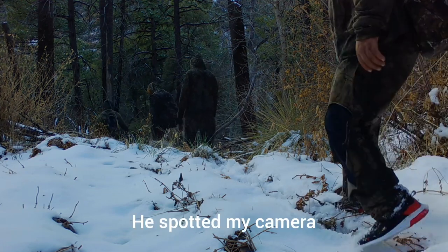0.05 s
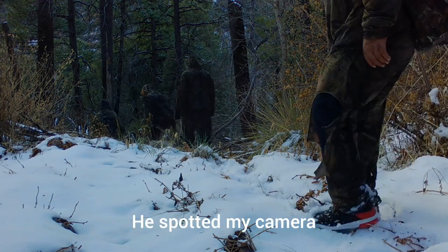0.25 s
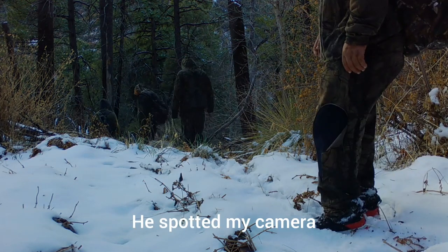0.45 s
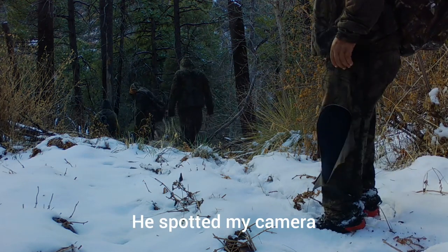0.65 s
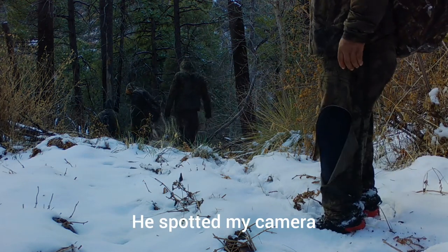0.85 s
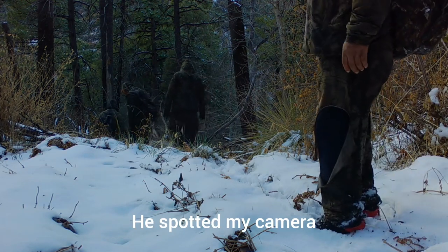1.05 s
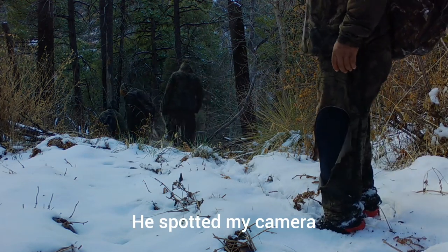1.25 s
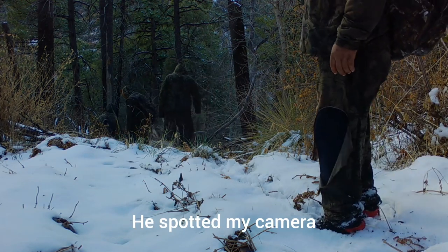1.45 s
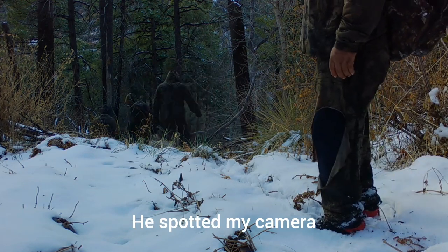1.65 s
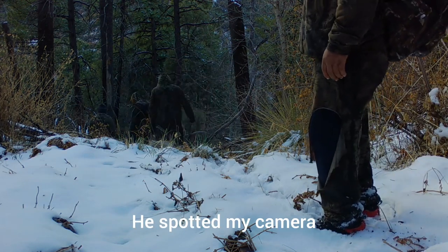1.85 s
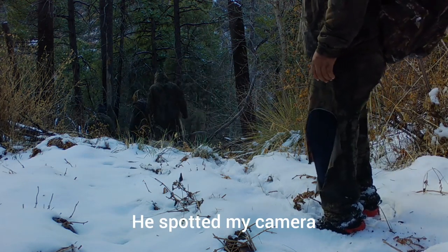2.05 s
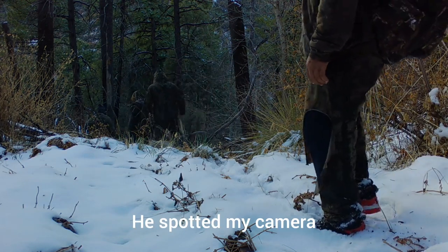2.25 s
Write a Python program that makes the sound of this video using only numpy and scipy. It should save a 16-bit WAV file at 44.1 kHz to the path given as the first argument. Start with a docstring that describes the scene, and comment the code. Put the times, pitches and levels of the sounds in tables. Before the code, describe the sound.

A sharp twig snap underfoot, then soft snowy footsteps and swishing dry stalks.

```python
"""A twig snaps sharply as a nearby walker sets a boot in snow among dry brush, shifts weight and moves on.
The fracture excites the twig's damped modes. Snow crunches as its crystals break and gives way in dull
knocks; stiff trouser cloth and dry stalks swish by stick-slip friction. The impacts echo faintly,
and light wind bumps the microphone over the hiss of the forest."""
import sys
import numpy as np
from scipy import signal
from scipy.fft import rfft, irfft
from scipy.io import wavfile

SR = 44100
rng = np.random.default_rng(int(sys.argv[2]) if len(sys.argv) > 2 else 0)


def dump(signal):
    """Clip the signal to [-1, 1] and save it as 16-bit WAV at the path in sys.argv[1]."""
    limited = np.clip(np.atleast_2d(signal).T, -1, 1)
    pcm = np.round(limited * 32767).astype(np.int16)
    wavfile.write(sys.argv[1], SR, pcm)


N = 101429

# Spectra of the noise sources: frequency_hz, relative_db
FOREST_SPECTRUM = [(20, 6), (100, 12), (180, 7.5), (300, 2), (500, 2.5), (1000, -6.5), (2500, -12.5),
                   (4000, -3.5), (5200, 0.5), (6100, 4), (7500, -4.5), (10000, -8), (15800, -21.5)]
WIND_SPECTRUM = [(10, -11.5), (22, 0), (36, 1), (52, 0), (75, -11), (120, -18.5), (180, -25), (250, -32.5),
                 (600, -34.5), (2000, -76)]
SLOW_SWISH_SPECTRUM = [(1000, -27.5), (2000, -16), (2700, -12.5), (3600, -9), (4600, -6.5), (5400, -1),
                       (6150, -1), (7300, -5), (9000, -11), (12000, -20), (15800, -27.5)]
FAST_SWISH_SPECTRUM = [(1000, -33), (2400, -24), (3200, -13.5), (4500, -11), (5400, -5.5), (6150, 0),
                       (7300, -4.5), (8500, -8), (10000, -9.5), (12500, -17), (15800, -26)]
CRACKLE_SPECTRUM = [(1500, -26.5), (3000, -4.5), (4500, -7.5), (6200, 3), (8000, -2), (10500, -6.5),
                    (12500, -13.5), (15800, -17.5)]
SCUFF_SPECTRUM = [(150, -9), (500, 0), (1200, -5), (1900, 2.5), (2600, -3.5), (4000, 2), (5800, 4),
                  (7500, -10), (11000, -14.5), (15800, -30.5)]
SNOW_SPECTRUM = [(80, -4.5), (160, -3), (280, -2.5), (500, 0), (1200, 0), (2000, -1.5), (2700, -6.5),
                 (4000, -7.5), (8000, -35)]

# Envelopes of the wind, the rubbing cloth and stalks, and the crunching snow: time_s, level_db
WIND_LEVEL = [(0.0, -51), (0.03, -47), (0.13, -63), (0.17, -47.5), (0.34, -56), (0.37, -44.5),
              (0.63, -66.5), (0.78, -43), (0.84, -54), (0.9, -40.5), (0.97, -60), (1.29, -49.5),
              (1.43, -63.5), (1.8, -59), (1.82, -46), (2.0, -62.5), (2.1, -53.5), (2.3, -58.5)]
SWISH_LEVEL = [(0, -54.5), (.1, -64), (.125, -46.5), (.175, -43), (.2, -40.5), (.23, -41.5), (.26, -46.5),
               (.31, -44), (.345, -51), (.4, -53), (.425, -47.5), (.45, -57), (.51, -52), (.55, -60.5),
               (.59, -50.5), (.68, -55), (.72, -53.5), (.76, -46), (.84, -46.5), (.91, -50.5), (.97, -54.5),
               (1.05, -52.5), (1.1, -58.5), (1.135, -51), (1.175, -60), (1.207, -43), (1.28, -40),
               (1.33, -41.5), (1.38, -34.5), (1.435, -30.5), (1.48, -32), (1.512, -31.5), (1.525, -27.5),
               (1.55, -33.5), (1.63, -32.5), (1.72, -37), (1.83, -42.5), (1.86, -49), (1.89, -52),
               (1.955, -49.5), (1.98, -56.5), (2.02, -53), (2.05, -45.5), (2.11, -48.5), (2.17, -52),
               (2.22, -59), (2.3, -63.5)]
CRUNCH_LEVEL = [(0, -61), (0.1, -68.5), (0.13, -54.5), (0.18, -53), (0.24, -52.5), (0.32, -56), (0.36, -59),
                (0.43, -60.5), (0.46, -64.5), (0.51, -59), (0.55, -65.5), (0.59, -58.5), (0.65, -59.5),
                (0.71, -62), (0.76, -59.5), (0.81, -56), (0.87, -66.5), (0.93, -58.5), (0.96, -64),
                (1.02, -57), (1.13, -57), (1.16, -68), (1.19, -61), (1.215, -51), (1.29, -55.5),
                (1.35, -64.5), (1.42, -54.5), (1.51, -54.5), (1.54, -48), (1.67, -51.5), (1.74, -54),
                (1.82, -59.5), (1.9, -59), (1.94, -64.5), (2.02, -59), (2.05, -51.5), (2.1, -53),
                (2.15, -56.5), (2.21, -67.5), (2.3, -68.5)]

# Dry brush and loose snow crackling against the boot: start_s, length_s, level_db
BRUSH_CRACKLES = [(.04, 0.010653, -50.5), (.494, 0.01949, -50.5), (1.04, 0.00958, -57.5),
                  (1.859, 0.12782, -50), (2.042, 0.09364, -51.5)]
# The sole scuffing the crust: start_s, length_s, level_db
SOLE_SCUFFS = [(.298, 0.03776, -51.5), (.575, 0.01834, -53), (.735, 0.05966, -51.5), (.921, 0.009193, -48),
               (1.126, 0.01463, -47.5), (1.205, 0.03338, -47)]
# Snow giving way under the boot: start_s, peak_db, pitch_hz, t60_s
SNOW_KNOCKS = [(.0428, -35, 809.9, 0.01449), (.1842, -42, 592.7, 0.003235), (.1872, -33.5, 581.3, 0.008315),
               (.2622, -38.5, 1383, 0.00387), (.411, -44.5, 600, .01), (.435, -43.5, 483, 0.01024),
               (.514, -43, 789.9, 0.00954), (.586, -45, 415.1, 0.0142), (.7285, -35.5, 890.2, 0.00582),
               (.7297, -29, 614.4, 0.012254), (.925, -40.5, 1082, 0.01374), (1.116, -41, 1033, 0.00749),
               (1.212, -37.5, 1886, 0.00951), (1.6742, -39, 1100, 0.00715), (1.6887, -26.5, 1258, 0.00523),
               (1.6898, -33, 742.9, 0.01031), (1.7875, -42, 855.3, 0.00865), (1.843, -38.5, 400.6, 0.02359),
               (2.0965, -35.5, 850, .008)]
# The boot's weight meeting the ground: start_s, peak_db, pitch_hz, t60_s
BOOT_THUDS = [(.039, -40.5, 162.7, 0.04026), (.58, -46.5, 116.6, 0.0867), (.731, -41.5, 190.1, 0.0584),
              (1.425, -47.5, 160.1, 0.0499), (1.59, -43.5, 110.3, 0.0746), (2.03, -48, 128, 0.0997),
              (2.096, -43.5, 273.5, 0.02535), (2.103, -42, 103.4, 0.1003)]
# Dry stalks cracking and ice flakes falling: start_s, peak_db, pitch_hz
BRITTLE_TICKS = [(.0062, -30, 6284), (0.0249, -36.5, 5922), (0.0455, -33, 5663), (0.0505, -32, 5969),
                 (0.0796, -36, 6204), (0.1752, -26.5, 6201), (0.1784, -26.5, 6499), (0.2631, -33, 5880),
                 (0.5002, -37.5, 6384), (1.409, -24.5, 6210), (1.439, -27, 6215), (1.5238, -19.5, 6612),
                 (1.5336, -21.5, 6340), (1.877, -35.5, 6994), (1.8986, -33, 6397), (1.924, -39, 7190),
                 (1.9388, -39, 6470), (1.9528, -35.5, 6147), (1.9555, -29.5, 7471), (1.959, -31, 6506),
                 (1.9925, -33, 6280), (1.995, -31, 3149), (2.007, -41.5, 7400)]
# Vibration modes of the twig: frequency_hz, relative_db, t60_s
TWIG_MODES = [(1702.4, -18, 0.0015425), (2488.1, -27.5, 0.014466), (3349.2, -21.5, 0.008195),
              (4367.5, -14, 0.005298), (4876.7, -13.5, 0.013117), (5094.6, -16, 0.02181),
              (6279.6, 1.5, 0.006102), (7233.7, -0.5, 0.003245), (8331.6, -6, 0.002753),
              (12137, -11.5, 0.002078)]
# Treble roll-off of the snap: frequency_hz, gain_db
SNAP_ROLLOFF = [(1000, 0), (12500, 0.5), (13800, -0.5), (15500, -14)]

LN_1000 = np.log(1000)  # a 60 dB decay in nepers


def amp(db):
    """Decibels to an amplitude ratio."""
    return 10 ** (np.asarray(db) / 20)


def unit(x):
    """Normalisation to an rms of 1."""
    return x / np.sqrt(np.mean(x ** 2) + 1e-20)


def envelope(points):
    """Amplitude from linear interpolation of time_s, level_db rows."""
    return amp(np.interp(np.arange(N) / SR, *np.transpose(points)))


def add(mix, start_s, sound):
    """Superposition of a delayed sound on the mix."""
    part = mix[max(round(start_s * SR), 0):][:len(sound)]
    part += sound[:len(part)]


def colour(x, spectrum, size=4096):
    """Minimum-phase filtering: the phase follows from the Hilbert transform of the log gain."""
    points_hz, points_db = np.transpose(spectrum)
    hz = abs(np.fft.fftfreq(size, 1 / SR))
    log_gain = np.log(amp(np.interp(np.log(hz + 1), np.log(points_hz), points_db)))
    response = np.exp(np.conj(signal.hilbert(log_gain)))
    taps = np.fft.ifft(response).real
    return signal.fftconvolve(x, taps[:size // 2])[:len(x)]


def grains(per_s, spread_db):
    """Shot noise: independent tiny impulses, a few larger than the rest."""
    sizes = amp(spread_db * np.minimum(rng.exponential(1, N), 4))
    return sizes * rng.choice([-1, 1], N) * (rng.random(N) < per_s / SR)


def flutter(depth_db, rate_hz):
    """Random amplitude modulation: the uneven gain of sticking and slipping."""
    lowpass = np.exp(-(np.fft.rfftfreq(N, 1 / SR) / rate_hz) ** 2)
    wander = irfft(rfft(rng.standard_normal(N)) * lowpass, N)
    return amp(depth_db * unit(wander))


def air(forest_db=-56.5):
    """Pressure fluctuations of wind rumble on the microphone over steady forest hiss."""
    rumble = unit(colour(rng.standard_normal(N), WIND_SPECTRUM, size=16384))
    hiss = unit(colour(rng.standard_normal(N), FOREST_SPECTRUM))
    return envelope(WIND_LEVEL) * rumble + amp(forest_db) * hiss


def echoes(x, level_db, t60_s):
    """Scattering from ground, legs and trunks returns sparse, exponentially decaying reflections."""
    t = np.arange(SR // 2) / SR
    reflections = rng.standard_normal(len(t)) * (rng.random(len(t)) < .1) * (t > .003)
    taps = reflections * np.exp(-LN_1000 * t / t60_s)
    return amp(level_db) * signal.fftconvolve(x, taps / np.linalg.norm(taps))[:N]


def swish(slow_db=-45.5, fast_db=-31.5):
    """Stick-slip friction of countless fibres; faster rubbing is louder and brighter."""
    level = envelope(SWISH_LEVEL)
    fast_share = np.clip((20 * np.log10(level) - slow_db) / (fast_db - slow_db), 0, 1)
    slips = grains(per_s=14000, spread_db=2.5) * flutter(depth_db=1.2953, rate_hz=78.8)
    slow = unit(colour(slips, SLOW_SWISH_SPECTRUM))
    fast = unit(colour(slips, FAST_SWISH_SPECTRUM))
    return level * ((1 - fast_share) * slow + fast_share * fast)


def flurries(rows, spectrum):
    """Brief contact with brush or snow crust radiates a burst of shot noise."""
    out = np.zeros(N)
    clicks = colour(grains(per_s=2200, spread_db=4.5), spectrum)
    for start_s, length_s, level_db in rows:
        flurry = clicks[round(start_s * SR):][:round(length_s * SR)]
        add(out, start_s, amp(level_db) * unit(flurry * signal.windows.tukey(len(flurry))))
    return out


def crunch():
    """Brittle fracture: snow crystals break in clumps under the sole, one impulse each."""
    breaks = grains(per_s=2200, spread_db=2.5) * flutter(depth_db=1.7652, rate_hz=64.95)
    return envelope(CRUNCH_LEVEL) * unit(colour(breaks, SNOW_SPECTRUM))


def knocks(rows, pitch_sag=0.1688, rise_cycles=0.41777, puff_gain=0.1661, puff_cycles=2.802):
    """A collapse or footfall excites a heavily damped oscillation and a puff of crushed snow."""
    out, t = np.zeros(N), np.arange(SR // 8) / SR
    for start_s, peak_db, pitch_hz, t60_s in rows:
        cycles = t * pitch_hz
        falling_hz = pitch_hz * (1 + pitch_sag * (np.exp(-cycles / 2) - .5))
        ring = np.exp(-LN_1000 * t / t60_s) * np.sin(2 * np.pi * np.cumsum(falling_hz) / SR)
        band = signal.butter(2, [pitch_hz / 4, pitch_hz * 2], "band", fs=SR)
        puff = unit(signal.lfilter(*band, rng.standard_normal(len(t)))) * np.exp(-cycles / puff_cycles)
        knock = np.minimum(cycles / rise_cycles, 1) * (ring + puff_gain * puff)
        add(out, start_s, amp(peak_db) * knock / abs(knock).max())
    return out


def ticks(t60_s=0.005807, splinter_gain=0.4564, splinter_decay_s=0.001546):
    """Impulsive excitation of a stalk or ice flake: one bright damped mode and a puff of splinters."""
    out, t = np.zeros(N), np.arange(SR // 50) / SR
    for start_s, peak_db, pitch_hz in BRITTLE_TICKS:
        ring = np.sin(2 * np.pi * pitch_hz * t) * np.exp(-LN_1000 * t / t60_s)
        splinters = unit(colour(rng.standard_normal(len(t)), FAST_SWISH_SPECTRUM))
        tick = ring + splinter_gain * splinters * np.exp(-t / splinter_decay_s)
        add(out, start_s, amp(peak_db) * tick / abs(tick).max())
    return out


def twig_snap(start_s=.20703, gain_db=-0.5, rise_s=0.00018435):
    """Fracture in two catches, the second softer, sets the twig's modes in free, damped vibration."""
    catch_gap_s, catch_gain, catch_centre_hz = 0.00086132, 0.3186, 6142
    out, t = np.zeros(N), np.arange(SR // 10) / SR
    onset = 1 - np.exp(-t / rise_s)
    for hz, relative_db, t60_s in TWIG_MODES:
        decay = np.exp(-LN_1000 * t / t60_s)
        ring = amp(gain_db + relative_db) * onset * decay * np.sin(2 * np.pi * hz * t)
        add(out, 0, ring)
        # The second catch mainly excites modes near its centre frequency.
        band_gain = amp(-28.5 * np.log2(hz / catch_centre_hz) ** 2)
        add(out, catch_gap_s, catch_gain * band_gain * ring)
    return np.roll(colour(out, SNAP_ROLLOFF), round(start_s * SR))


def scene():
    """Linear superposition of impacts, their reflections, friction and air in one channel."""
    impacts = twig_snap() + ticks() + knocks(SNOW_KNOCKS) + knocks(BOOT_THUDS)
    near_echoes = echoes(impacts, level_db=-18.5, t60_s=0.09136)
    far_echoes = echoes(impacts, level_db=-32, t60_s=0.5165)
    movement = swish() + crunch()
    movement += flurries(BRUSH_CRACKLES, CRACKLE_SPECTRUM) + flurries(SOLE_SCUFFS, SCUFF_SPECTRUM)
    return (impacts + near_echoes + far_echoes + movement + air())[None]


def record(dry):
    """Band limiting by a linear-phase low-pass filter."""
    cutoff_hz = 15850
    taps = signal.firwin(511, cutoff_hz, window=("kaiser", 9), fs=SR)
    return signal.oaconvolve(dry, taps[None], "same")


dry = scene()
out = record(dry)
dump(out)
```